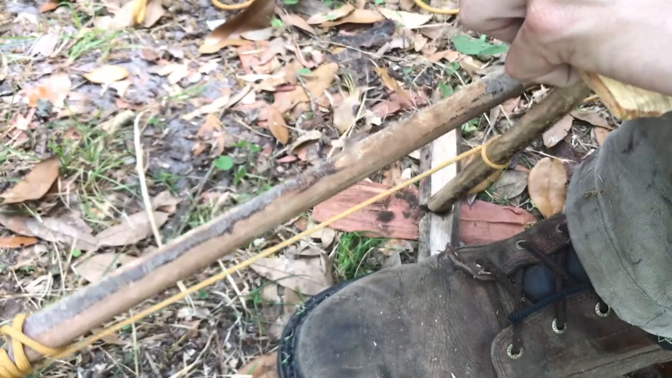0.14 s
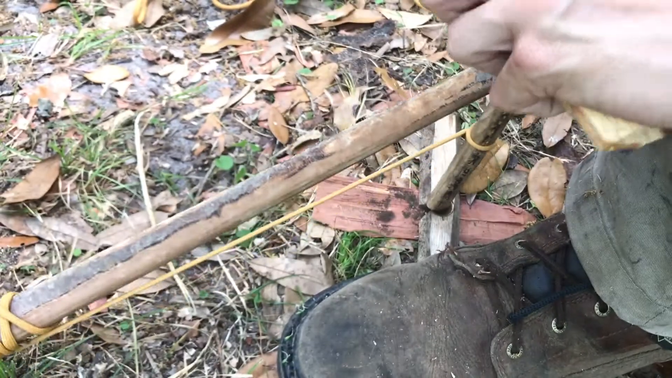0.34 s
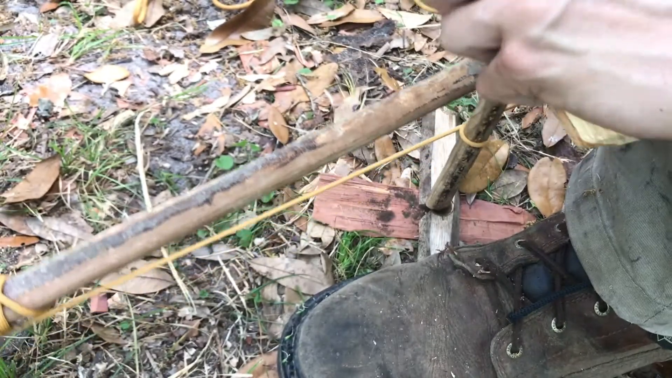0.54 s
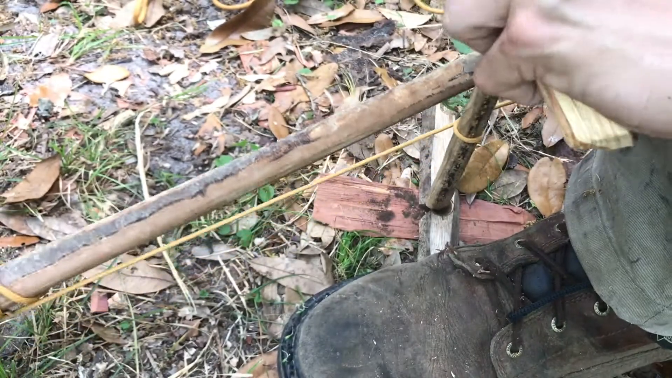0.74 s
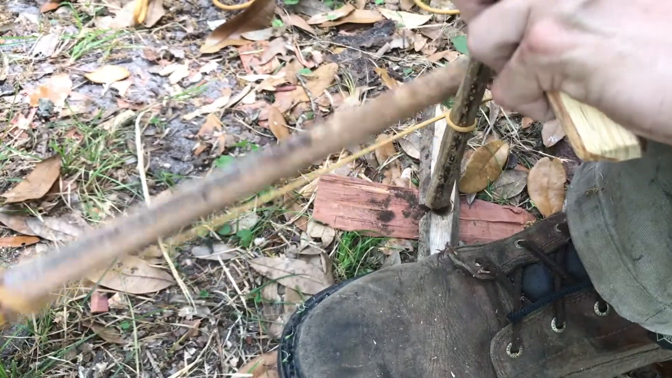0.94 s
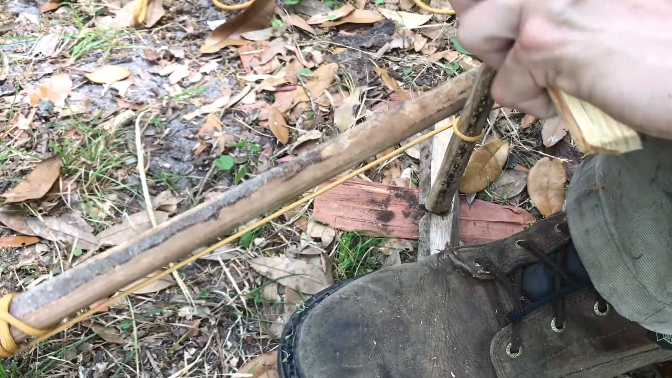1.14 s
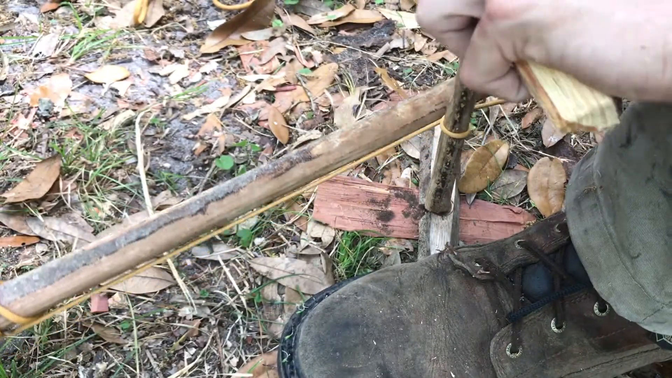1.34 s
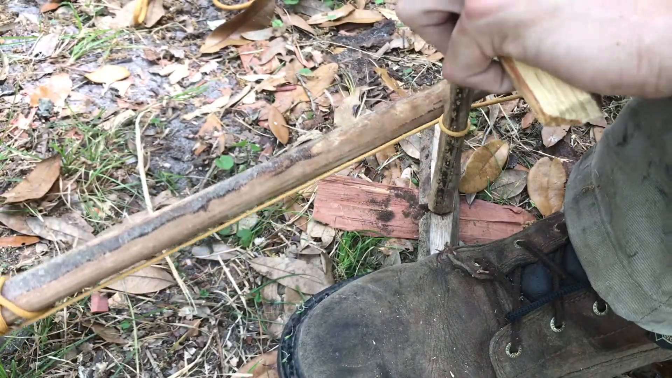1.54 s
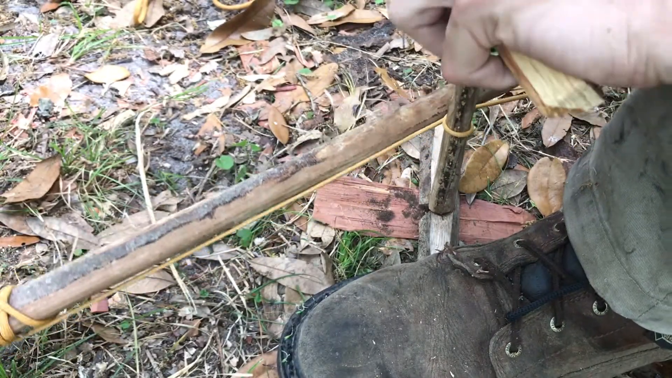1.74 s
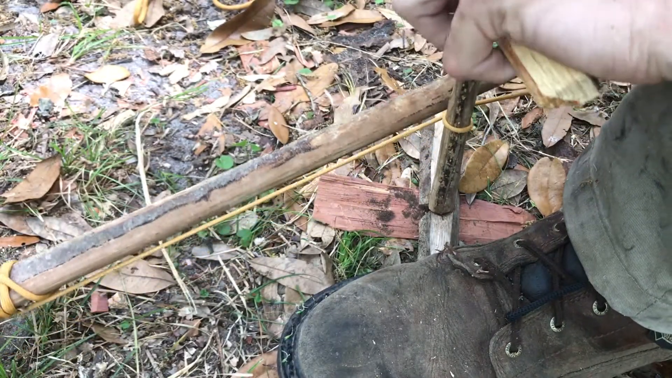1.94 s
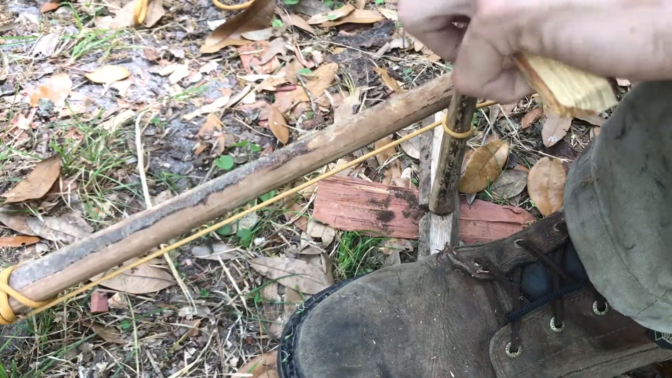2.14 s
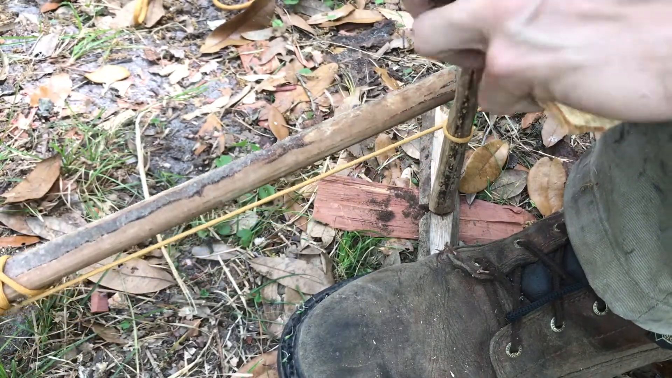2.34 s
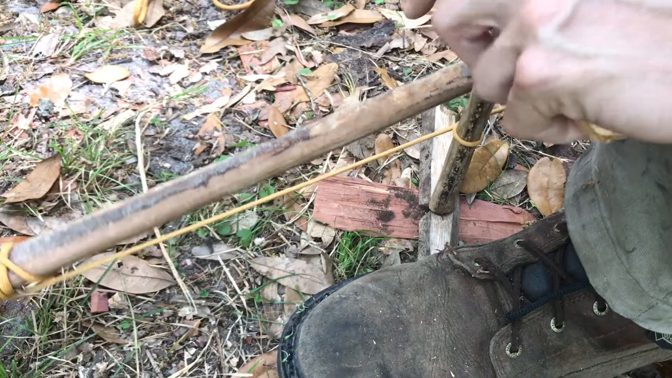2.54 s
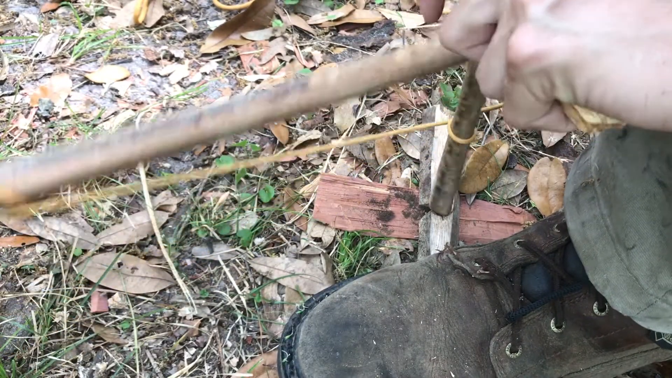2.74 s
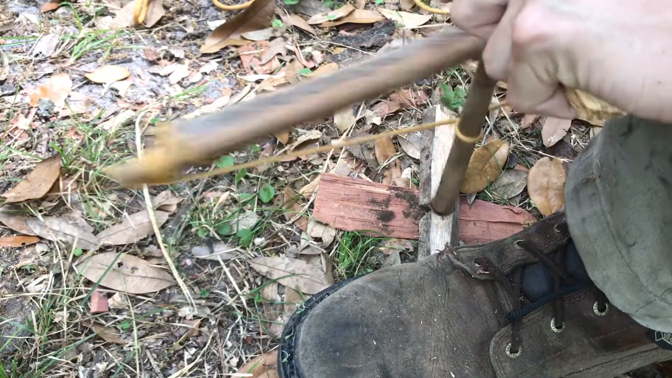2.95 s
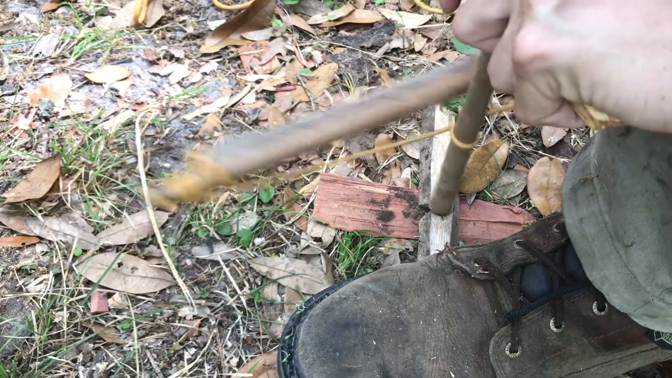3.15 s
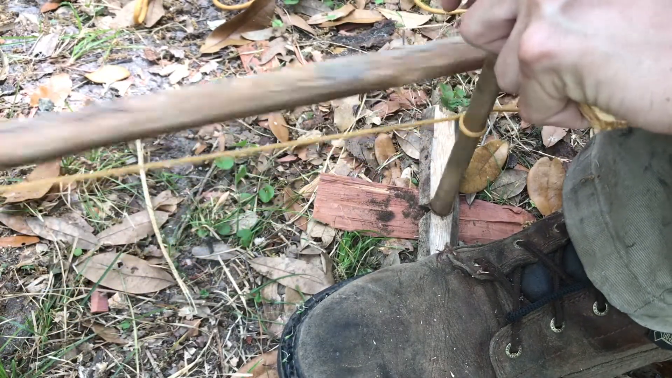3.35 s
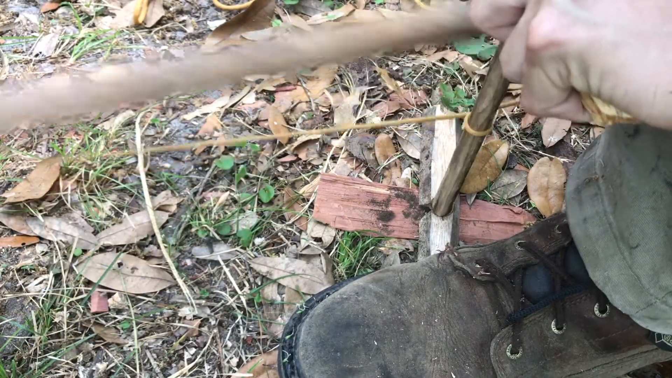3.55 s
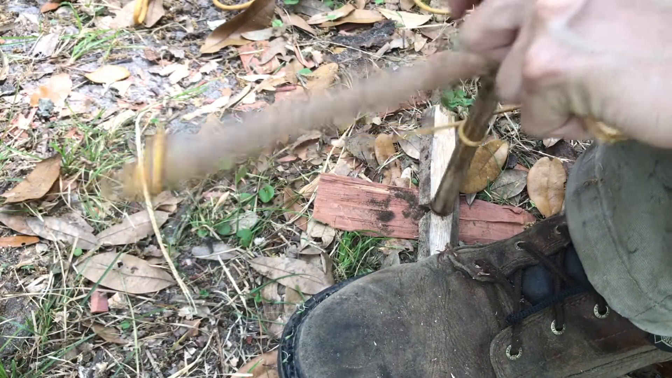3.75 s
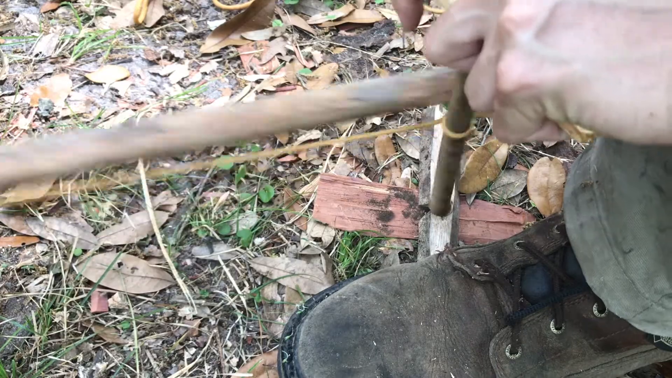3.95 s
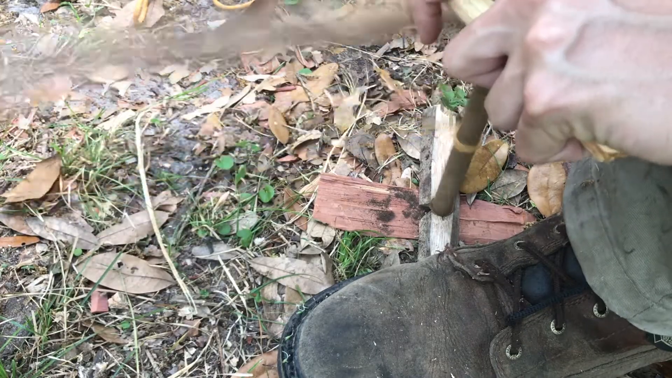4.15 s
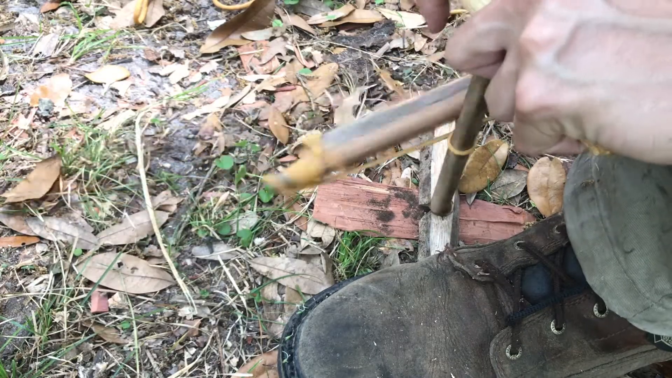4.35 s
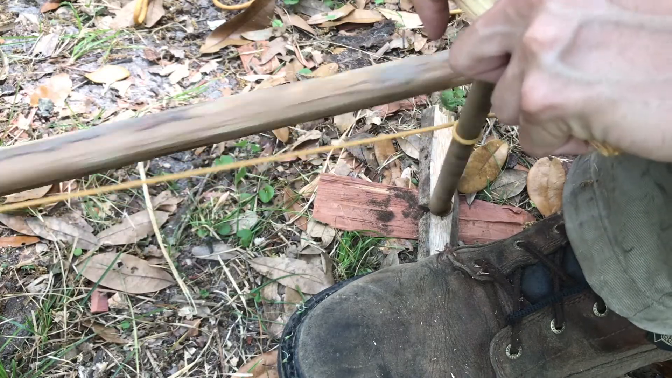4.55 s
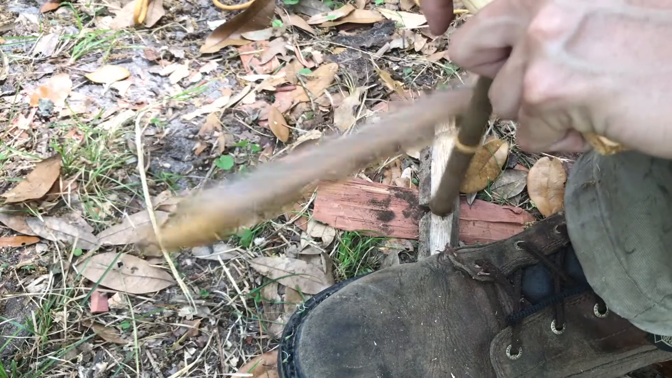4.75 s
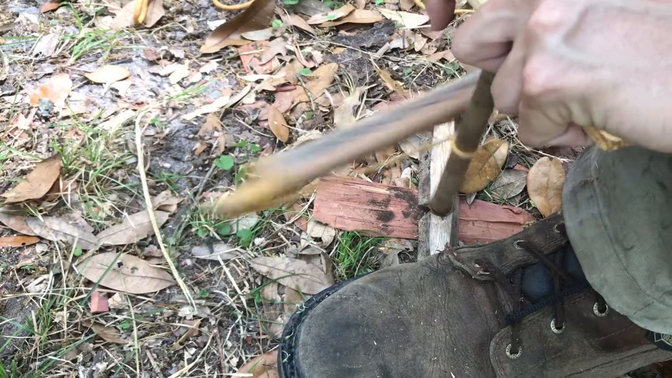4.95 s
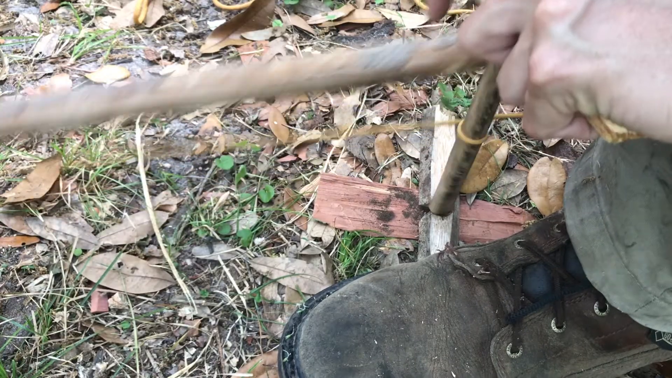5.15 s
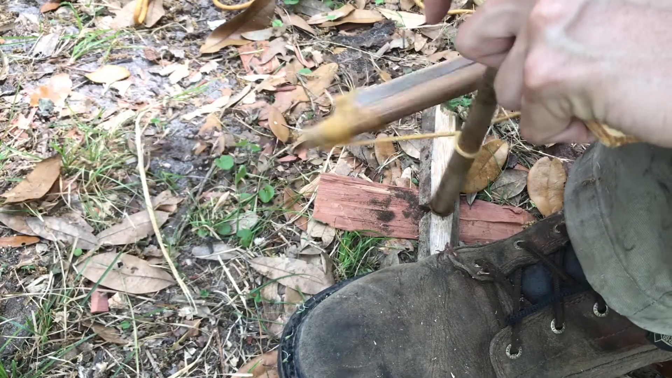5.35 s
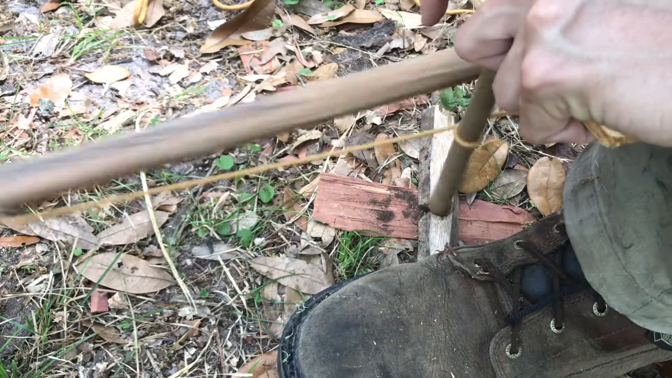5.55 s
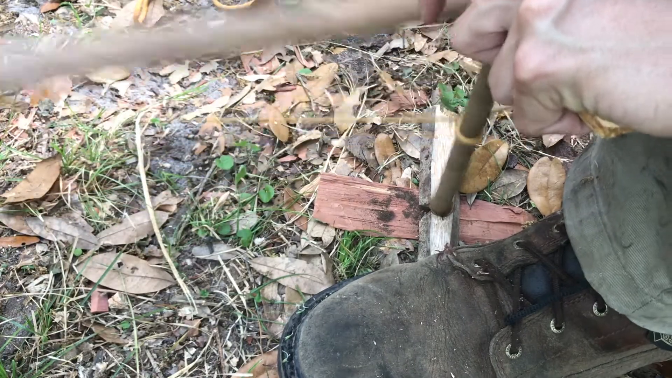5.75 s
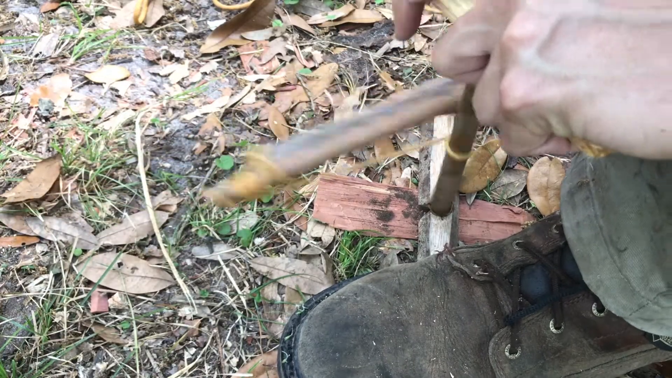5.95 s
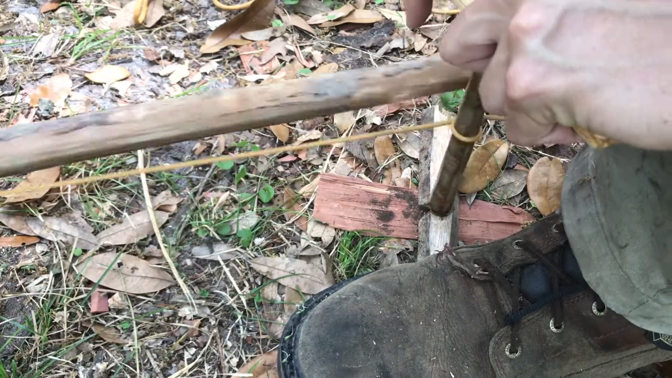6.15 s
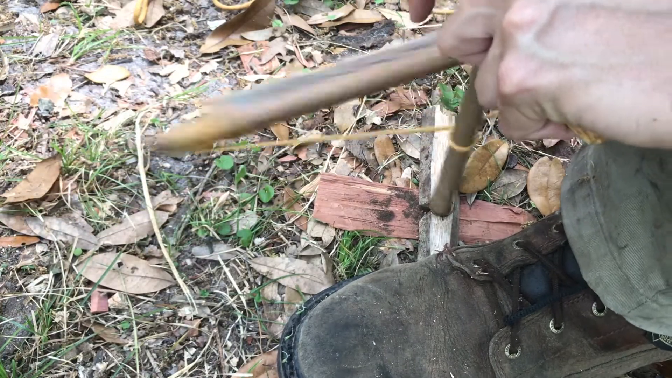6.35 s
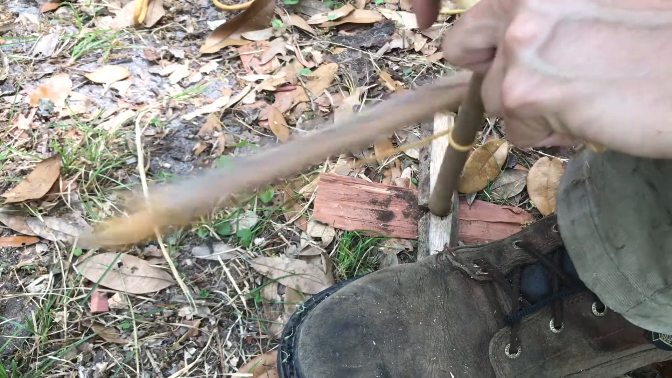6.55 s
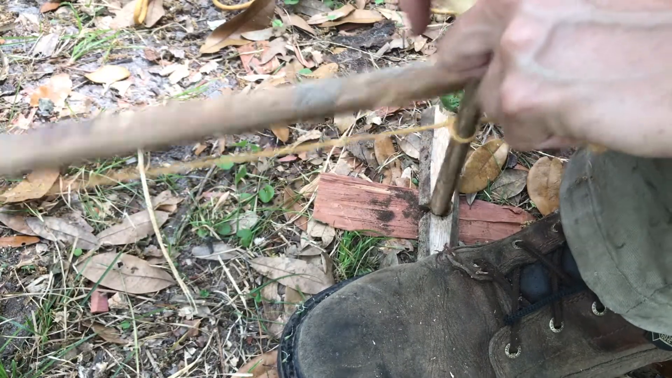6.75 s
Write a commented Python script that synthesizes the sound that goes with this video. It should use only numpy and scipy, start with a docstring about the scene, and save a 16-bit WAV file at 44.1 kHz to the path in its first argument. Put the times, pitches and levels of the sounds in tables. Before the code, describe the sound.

Almost three seconds of soft leaf crackle and stick taps, with one loud dry snap, come over high insect buzz and distant birds. Then uneven scraping strokes start and settle into a steady to-and-fro rasp of wood grinding on wood, each stroke swelling and dipping as the bow reverses. Brief piping squeaks and low knocking shudders join in. Mono, close and dry, in open air.

```python
"""Bow drill outdoors

Close to a small microphone, after some fumbling, a bow saws to and fro and spins a wooden spindle in
a fireboard: torn noise through resonances grinds and throbs once a turn, decaying modes knock and bump,
short swelling tones squeak or pip. Behind it narrow noise buzzes as insects high up, gliding breathy
tones whistle as far birds, and a low drone of slow noise hangs in the air."""
import sys
import numpy as np
from scipy import signal
from scipy.fft import rfft, irfft
from scipy.io import wavfile
from scipy.ndimage import uniform_filter1d

SR = 44100
rng = np.random.default_rng(int(sys.argv[2]) if len(sys.argv) > 2 else 0)


def to_wav(sig):
    """Store sig (one row per channel, or 1-D mono) as 16-bit WAV at the path in sys.argv[1].

    Samples outside -1..1 are clipped; the rate is SR.
    """
    pcm = np.clip(np.atleast_2d(sig), -1, 1) * 32767
    pcm = np.round(pcm).astype(np.int16)
    wavfile.write(sys.argv[1], SR, pcm.T)  # frames by channels


N = 299439
TIME = np.arange(N) / SR  # [s]


def amp(db):
    """Turns decibels into an amplitude factor."""
    return 10 ** (np.asarray(db) / 20)


def evened(x):
    """Scales x to an rms of one."""
    return x / np.sqrt(np.mean(x ** 2) + 1e-20)


def add(mix, start, sound):
    """Lays a sound into the mix from its start [s], cut at the end of the mix."""
    part = mix[max(round(start * SR), 0):][:len(sound)]
    part += sound[:len(part)]


def coloured(x, points, peaks=(), bed_db=0):
    """Gives x a smooth spectrum, with resonances standing on it."""
    hz = np.fft.rfftfreq(len(x), 1 / SR)
    point_hz, point_db = np.transpose(points)
    bed = np.interp(np.log(hz + 1), np.log(point_hz + 1), point_db) + bed_db
    power = amp(bed) ** 2
    for centre, width, top_db in peaks:
        power = power + amp(top_db) ** 2 / (1 + (2 * (hz - centre) / width) ** 2) ** 2
    return irfft(rfft(x) * np.sqrt(power), len(x))


def resonate(x, hz, width):
    """Resonates at the curve hz: shifts it down to zero, smooths twice and shifts back."""
    turn = np.exp(2j * np.pi * np.cumsum(hz * np.ones(len(x))) / SR)
    r = np.exp(-np.pi * width / SR)
    smooth = signal.lfilter([(1 - r) ** 2], [1, -2 * r, r * r], x / turn + 1e-18)
    return 2 * (turn * smooth).real


def wander(seconds):
    """Random drift of unit size that changes over the given time."""
    size = max(int(seconds * SR), 2)
    return evened(uniform_filter1d(uniform_filter1d(rng.standard_normal(N), size), size))


def patchy(x, depth_db, bins, frames):
    """Random patches in time and pitch make the sound swell and sink."""
    spectrum = signal.stft(x, nperseg=256, noverlap=192)[2]
    field = rng.standard_normal(spectrum.shape)
    for _ in range(2):
        field = uniform_filter1d(field, max(int(bins), 1), axis=0)
        field = uniform_filter1d(field, max(int(frames), 1), axis=1)
    patches = spectrum * amp(depth_db * evened(field))
    return signal.istft(patches, nperseg=256, noverlap=192)[1][:len(x)]


def air():
    """Distant rumble and hiss of coloured noise, with the drone's narrow noise lines wavering in it."""
    # spectrum of the open air, relative: (frequency [Hz], level [dB])
    air_spectrum = [(15, -54), (25, -11), (84, -3), (130, -13.5), (166, -9.5), (190, -27.5), (249, -20),
                    (405, -27.5), (1160, -33), (2050, -34), (5000, -37.5), (7110, -27.5), (10400, -49.5),
                    (14400, -28), (16000, -55)]
    # lines of a far engine: (frequency [Hz], width [Hz], level [dB])
    engine_lines = [(80.5, 5.8, -76.5), (161.5, 11.4, -79.5)]
    drone = np.zeros(N)
    for hz, width, db in engine_lines:
        drone += amp(db) * evened(resonate(rng.standard_normal(N), hz, width))
    level_db = -63.5 + 1.9 * wander(0.37)
    return amp(level_db) * evened(coloured(rng.standard_normal(N), air_spectrum)) + drone


def insects():
    """A smooth chorus of band noise, and one nearer singer whose buzz comes in short regular bursts."""
    # how the buzz moves: (time [s], level [dB], share of the nearest singer [0-1])
    buzz_course = [(0.0, -66.5, 0.3), (0.57, -67, 0.46), (0.83, -65.5, 0.56), (1.56, -66, 0.34),
                   (1.74, -67.5, 0.34), (1.94, -66.5, 0.5), (2.12, -63, 0.62), (2.28, -64.5, 0.43),
                   (2.46, -66, 0.45), (2.7, -68.5, 0.44)]
    time, db, near = np.transpose(buzz_course)
    beats = np.cumsum(52 * (1 + .012 * wander(0.28))) / SR  # about 52 bursts a second
    bursts = rng.standard_normal(N) * np.exp(-(beats % 1) / 0.37)
    chorus = evened(resonate(rng.standard_normal(N), hz=7470, width=1400))
    singer = evened(resonate(bursts, hz=7050, width=460))
    near = np.clip(np.interp(TIME, time, near), 0, 1)
    both = np.sqrt(1 - near) * chorus + np.sqrt(near) * singer
    return amp(np.interp(TIME, time, db)) * both


def birds():
    """Far whistles of gliding tone and breathy noise; the trees send a smear of echoes after them."""
    # one row a whistle: (start [s], length [s], first pitch [Hz], last pitch [Hz], top level before
    # tone and breath are blended [dB], how much the glide slows at its end, place of the top [0-1])
    whistles = [(0, 0.23, 2590, 1710, -75.5, 1.8, 0.3), (0, .12, 2900, 2950, -80, 1.1, .1),
                (0.178, .1, 3630, 3230, -88, 1.1, .4), (.43, .09, 2210, 2160, -85, 1.1, .2),
                (0.565, .28, 3105, 1866, -76, 1.6, 0.56), (.56, .07, 4500, 4500, -82, 1.1, .2),
                (0.733, 0.15, 4370, 4450, -80, 1.1, .85), (0.918, 0.18, 2700, 2690, -75, 1.1, 0.1),
                (0.936, 0.2, 4500, 4420, -76, 1.1, 0.3), (1.958, 0.2, 3690, 3630, -75, 1.1, 0.1),
                (2.024, 0.51, 2770, 2460, -76, 4.5, .3), (3.692, .1, 2390, 2360, -73, 1.1, 0.4),
                (0.303, 0.19, 10950, 14400, -81, 1.05, .5), (.3, .1, 12500, 14100, -85, 1.1, .4),
                (.42, .05, 12300, 12600, -83, 1.1, .4), (.44, .1, 11200, 11550, -87, 2.5, .4),
                (0.562, .27, 14000, 11300, -81, 1.2, 0.2), (0.632, 0.16, 14700, 12200, -88, 1.1, .3)]
    out = np.zeros(N)
    for start, length, first_hz, last_hz, top_db, bend, top in whistles:
        t = np.arange(0, length, 1 / SR)
        hz = last_hz + (first_hz - last_hz) * np.clip(1 - t / length, 0, 1) ** bend
        # swells to its top and fades
        db = top_db + np.interp(t / length, [0, np.clip(top, .01, .99), 1], [-2.5, 0, -13])
        pure = np.sqrt(2) * np.sin(2 * np.pi * np.cumsum(hz) / SR)
        breath = evened(resonate(rng.standard_normal(SR)[:len(t)], hz, width=130))
        whistle = 0.36 * pure + 1.15 * breath
        add(out, start, amp(db) * whistle * signal.windows.tukey(len(t), .06))
    echoes = rng.standard_normal(SR // 2) * amp(-60 * TIME[:SR // 2] / .55)  # 60 dB down in 0.55 s
    echoes /= np.linalg.norm(echoes)
    return out + amp(-1.5) * signal.oaconvolve(out, echoes)[:N]


def rustles():
    """Crackly noises that swell and stop, over sparse faint crackle of the litter."""
    # spectrum of dry leaves, relative: (frequency [Hz], level [dB])
    leaf_spectrum = [(290, -41.5), (500, -6.5), (3540, -9.5), (5630, -5), (6510, -4.5), (9220, -1),
                     (10800, -12.5), (12900, 1.5), (16000, -17)]
    # short noises, and quiet low rubbing between strokes:
    # (start [s], length [s], level before the swell [dB], centre [Hz], level of the centre band [dB])
    short_noises = [(0.523, 0.032, -55, 3700, -4), (0.568, 0.018, -66, 3300, -1),
                    (0.92, 0.048, -62, 4180, -3), (1.002, 0.017, -42, 4500, -6),
                    (1.034, 0.041, -58.5, 3680, -3), (1.085, 0.0073, -55, 2960, -10),
                    (1.126, 0.0068, -66, 4270, 2), (1.511, 0.01, -49.5, 4800, -3),
                    (1.532, 0.018, -44, 5460, -7.5), (1.694, 0.0091, -49, 5000, -4),
                    (1.905, 0.029, -64.5, 3630, 9.5), (2.28, 0.026, -58, 3850, -5),
                    (2.385, 0.033, -62.5, 4000, -9), (2.442, 0.019, -67, 2300, 1),
                    (2.66, 0.071, -61, 4000, -15), (3.045, 0.15, -53, 2270, -18),
                    (3.42, 0.043, -60, 3000, -4.5), (3.553, 0.086, -64.5, 596, 2.5),
                    (2.68, 0.56, -84, 344, 18.5), (2.723, 0.055, -51.5, 3500, -4)]
    crackly = rng.standard_normal(N) * amp(2.2 * wander(0.0011))
    hiss = evened(coloured(crackly, leaf_spectrum))
    out = np.zeros(N)
    for start, length, db, hz, centre_db in short_noises:
        part = hiss[int(start * SR):int((start + length) * SR)]
        part = part + amp(centre_db) * evened(resonate(part, hz, 0.57 * hz))
        place = np.linspace(0, 1, len(part))
        swell = np.interp(place, [0, .45, .85, 1], [0.18, 0.55, 0.43, 0.43])
        add(out, start, amp(db) * part * swell)
    clicks = (rng.random(N) < 14 / SR) * amp(-69 + 4.0 * rng.random(N))  # about 14 a second
    crackle = hiss * signal.oaconvolve(clicks, np.hanning(200))[:N]
    return out + patchy(crackle, depth_db=3.6, bins=14, frames=4.3)


def ticks():
    """A blow rings the modes near its centre, snaps, thuds, and comes back weaker off the ground."""
    # what the sticks ring with: (frequency [Hz], level [dB], fall by 60 dB [s])
    wood_modes = [(333, -27, 0.03), (820, -3.5, 0.022), (1235, 2, 0.011), (1427, -2, 0.014),
                  (2474, -1, 0.013), (2845, -1, 0.016), (3340, 4, 0.0084), (3664, -3.5, 0.016),
                  (4510, 8, 0.0061), (5360, -0.5, 0.014), (5195, 7.5, 0.0065), (6120, -4, 0.011),
                  (8460, 3, 0.0064), (563, -19, 0.0083)]
    # wood knocks: (time [s], peak of the ring [dB], centre of the modes struck [Hz], spread [octaves],
    # crisp snap against the ring [dB], low thud against the ring [dB])
    knocks = [(.858, -48.5, 4500, 0.62, 3, -17), (1.015, -37.5, 1250, 0.69, -12, -10),
              (1.099, -47.5, 4420, 0.93, 4, -16), (1.102, -55, 786, 0.49, -30, -2),
              (1.522, -52, 5000, 0.54, -2, -6), (1.54, -50.5, 1320, 0.48, -6, -1.5),
              (1.7058, -20.5, 3600, 1.7, 4.5, -26.5), (2.014, -51, 5200, 0.49, 9, -35),
              (2.064, -60, 4170, 0.37, -12, -30), (2.381, -41, 1460, 0.6, -11, -19),
              (2.682, -42.5, 4500, 0.81, 7, -36), (2.725, -49, 4000, .6, 2, -19),
              (2.753, -31.5, 5130, 0.65, 4.5, -32), (4.016, -58, 3000, 1.0, -8, -2),
              (6.742, -48.5, 2500, 1.2, -8, -22)]
    out, t = np.zeros(N), np.arange(2500) / SR
    hz, mode_db, t60 = np.transpose(wood_modes)[:, :, None]
    noises = rng.standard_normal((len(knocks), len(t)))
    for (start, db, centre_hz, spread, snap_db, thud_db), noise in zip(knocks, noises):
        weight_db = mode_db - 4.4 * (np.log2(hz / centre_hz) / spread) ** 2
        phase = noise[:len(hz), None]
        modes = amp(weight_db - 60 * t / t60) * np.sin(2 * np.pi * hz * t + phase)
        ring = modes.sum(0) * np.minimum(t / 0.0021, 1)
        burst = noise * amp(-60 * t / 0.0061) * np.minimum(t / 0.00074, 1)
        snap = resonate(burst, hz=14500, width=6400)
        glide_hz = 210 + 600 * np.exp(-t / 0.0046)  # the thud sinks as the stick settles
        thud = np.sin(2 * np.pi * np.cumsum(glide_hz) / SR)
        thud *= amp(-60 * t / 0.064) * np.minimum(t / 0.0041, 1)
        knock = ring / abs(ring).max() + amp(snap_db) * snap / abs(snap).max() + amp(thud_db) * thud
        knock *= amp(db)
        add(out, start, knock)
        add(out, start + 0.0029, 0.23 * knock)  # off the ground
    return out


def squeaks():
    """Each tone swells at one pitch and is cut short, while other modes of the wood rattle along."""
    # short tones: squeaks of the turning spindle, and small pips of wood ringing at one pitch:
    # (peak time [s], peak of the tone [dB], length [s], pitch [Hz], rattle of other modes [dB])
    short_tones = [(1.59, -44.5, 0.0025, 3970, -24), (1.99, -49.5, 0.0046, 2690, -24),
                   (3.492, -34.5, 0.0056, 3540, -16.5), (3.531, -37, 0.0091, 2610, -11),
                   (3.538, -36, .008, 3460, -13), (4.124, -23, 0.0046, 3320, -15),
                   (4.139, -34, 0.011, 3550, -25), (4.17, -25, 0.0098, 3310, -9),
                   (4.201, -19, 0.0075, 3300, -12.5), (4.221, -28, 0.0036, 3250, -6),
                   (4.231, -19, 0.0088, 3290, -15), (4.245, -43, 0.0028, 3300, -18),
                   (4.263, -32, 0.0076, 3190, -10), (4.27, -37, .004, 3200, -12),
                   (4.271, -39.5, 0.013, 1910, -25), (4.405, -35, 0.01, 2320, -9),
                   (4.473, -36, 0.0061, 2350, -1), (4.677, -31, 0.0045, 3380, -3.5),
                   (4.718, -22, 0.0083, 3310, -22), (4.744, -19.5, 0.0044, 3300, -21),
                   (4.77, -23, .007, 3300, -19), (4.782, -40, .005, 3250, -23),
                   (5.257, -31.5, 0.0061, 3320, -10), (5.279, -29, 0.0029, 3240, -7),
                   (6.002, -36, 0.0048, 2490, -10)]
    # modes shaken along: (frequency [Hz], width [Hz], level [dB])
    shaken_modes = [(1190, 400, -6), (2030, 310, -4), (5330, 460, -3)]
    out, rattle = np.zeros(N), np.zeros(N)
    for hz, width, db in shaken_modes:
        rattle += amp(db) * evened(resonate(rng.standard_normal(N), hz, width))
    for (middle, db, length, hz, others_db), phase in zip(short_tones, rng.random(len(short_tones))):
        t = np.arange(-1.5 * length, length, 1 / SR)
        swell = np.exp(-(t / np.where(t < 0, 0.71 * length, 0.18 * length)) ** 2)
        tone = np.sin(2 * np.pi * (hz * t + phase))
        tone += amp(others_db) * rattle[int(middle * SR):][:len(t)]
        add(out, middle + t[0], amp(db) * swell * tone)
    return out


def strokes():
    """The bow swings like a pendulum; level and colour follow its speed."""
    # bow strokes: (start [s], length [s], level at top speed [dB], share of the swing lost before the
    # spindle breaks loose [0-1], lateness of top speed, share of pull colour [0-1],
    # board tone at top speed [dB], treble at top speed [dB])
    bow_strokes = [(2.751, 0.11, -39, 0.14, 1.5, 0.82, -3, -3),
                   (2.856, 0.19, -34.5, 0.074, 1.26, 0.36, -1, -2.5),
                   (3.118, 0.28, -35.5, 0.076, 1.02, 0.17, -1.5, 1.5),
                   (3.463, .1, -31.5, 0.025, 1.53, 0.52, -4, -2.5),
                   (3.557, 0.11, -46, .35, 1.1, 0.85, -8, 3.5),
                   (3.633, 0.085, -35.5, 0.11, 0.91, .6, -4, -3.5),
                   (3.755, 0.25, -35, 0.041, 1, .07, -2.5, 1),
                   (4.023, 0.3, -34, 0.05, 1.11, 0.68, -0.5, -2),
                   (4.344, 0.26, -35, 0.019, 1.045, 0.01, -.5, 1.5),
                   (4.61, .25, -33, 0.064, 1.13, 0.66, 1, -2.5),
                   (4.884, 0.25, -34.5, 0.15, 1.31, 0.22, 1, 0.5),
                   (5.148, 0.24, -30.5, 0.037, 1.05, 0.73, -1.5, -3.5),
                   (5.407, 0.23, -34, 0.24, 1.73, .12, -1, 0),
                   (5.657, 0.21, -29.5, 0.17, 1.59, 0.75, -3, -5),
                   (5.933, 0.23, -35, 0.17, 1.03, 0.08, -.5, 2),
                   (6.176, 0.24, -30, 0.0085, 1.25, .79, -4, -4.5),
                   (6.48, 0.25, -35.5, 0.21, 1.18, 0.02, .5, 2.5),
                   (6.756, 0.3, -33, .01, 1.16, 0.66, -1, .1)]
    # the spindle jams for a moment: (middle [s], length [s], dip [dB])
    jams = [(3.624, 0.014, -2), (4.103, 0.016, -13), (5.684, 0.012, -7), (5.938, 0.0028, -20),
            (6.4867, 0.0039, -24)]
    db_per_speed = 21.5  # level gained for ten times the speed
    board_slow_db, treble_slow_db = (1, -6.0), (1.5, -2.5)  # change towards standstill: (push, pull)
    gain, pull, board_db, treble_db = np.zeros((4, N))
    for start, length, top_db, lost, late, pull_share, tone_db, tilt_db in bow_strokes:
        on = (TIME >= start) & (TIME < start + length)
        lost = np.clip(lost, 0, 1)
        swing = lost + (1 - lost) * (TIME[on] - start) / length
        speed = np.clip(np.sin(np.pi * swing ** late), 1e-4, 1)
        gain[on] += amp(top_db + db_per_speed * np.log10(speed))
        pull[TIME >= start] = pull_share
        board_db[on] = tone_db + np.interp(pull_share, [0, 1], board_slow_db) * (1 - speed)
        treble_db[on] = tilt_db + np.interp(pull_share, [0, 1], treble_slow_db) * (1 - speed)
    jam_db = np.zeros(N)
    for middle, length, dip_db in jams:
        jam_db += dip_db * np.exp(-(2 * (TIME - middle) / length) ** 2)
    gain = uniform_filter1d(gain, size=40) * amp(jam_db)
    return gain, pull, uniform_filter1d(board_db, size=200), uniform_filter1d(treble_db, size=200)


def drill():
    """Fibres tear in dense clumps; the uneven tip presses harder once a turn."""
    # resonances of spindle, socket and board, either way: (frequency [Hz], width [Hz], level [dB])
    push_modes = [(1232, 276, -5.5), (1580, 240, -8.5), (2319, 260, -0.5), (4090, 540, -2), (5436, 1260, 1),
                  (8450, 350, 0.5), (9720, 400, -3), (12900, 330, -37.5)]
    pull_modes = [(1506, 140, -4.5), (2563, 260, 2.5), (3660, 490, -3), (5380, 200, -16.5), (6800, 880, -5),
                  (8860, 450, 0.5), (11300, 320, -4.5), (12800, 430, 1), (13400, 64, 6), (14100, 59, -11)]
    # grinding noise between the resonances, relative: (frequency [Hz], level [dB])
    grit_spectrum = [(410, -79), (700, -36), (1210, -4), (1800, -10), (3370, -1), (7690, -5.5),
                     (8760, -4.5), (10700, -9), (13100, 0), (16000, -9)]
    # shudder of the board on the ground, relative: (frequency [Hz], level [dB])
    shudder_spectrum = [(65, -60), (110, -2), (151, -1.5), (236, 3.5), (461, -5), (611, -7.5), (900, -8.5),
                        (1170, -32), (1980, -120)]
    gain, pull, board_db, treble_db = strokes()
    turns = np.cumsum(34.2 * (1 + 0.1387 * wander(0.0575))) / SR  # about 34 turns a second
    throb_db = 1.0 * np.cos(2 * np.pi * turns) + 1.33 * wander(0.006) + 1.3 * wander(0.0016)
    fibres = rng.standard_normal(N) * amp(throb_db)
    fibres = patchy(fibres, depth_db=1.93, bins=3, frames=6)
    pull = np.clip(pull, 0, 1)
    grind = np.sqrt(1 - pull) * evened(coloured(fibres, grit_spectrum, push_modes, bed_db=-1.0))
    # reversed in time, the same noise serves as a second one
    grind += np.sqrt(pull) * evened(coloured(fibres[::-1], grit_spectrum, pull_modes, bed_db=-0.5))
    board = signal.sosfiltfilt(signal.butter(3, 2900, fs=SR, output="sos"), grind)
    treble = signal.sosfiltfilt(signal.butter(3, 7600, "high", fs=SR, output="sos"), grind)
    middle = grind - board - treble
    shudder = amp(-25.5) * evened(coloured(fibres * amp(0.59 * throb_db), shudder_spectrum))
    # patches come and go as the contact shifts from mode to mode
    sound = amp(board_db) * patchy(board, depth_db=1.0, bins=1.4, frames=6.4)
    sound += amp(1.2 * board_db) * shudder + middle + amp(treble_db) * treble
    return gain * sound


def bumps():
    """Each bump is a soft push that sets the board ringing briefly; five make a run."""
    # fireboard modes: (frequency [Hz], level [dB], fall by 60 dB [s])
    board_modes = [(260, -6, 0.024), (594, -6.5, 0.019), (1057, -3.5, 0.023), (1275, 3.5, 0.018)]
    # the crooked tip bumps the wall of its socket once a turn, in runs: (middle bump [s],
    # turns a second before the gaps are stretched [Hz], peak [dB], loss at the next bumps [dB])
    bump_runs = [(3.263, 25, -43, 2.5), (4.19, 30, -34, 3), (4.471, 29.3, -37.5, 1.5),
                 (4.739, 43, -33.5, 3.5), (5.018, 39, -38.5, 0.5), (5.274, 42, -40, 2.2),
                 (5.524, 40, -33.5, 1.2), (5.788, 33, -37.5, 7.5), (6.026, 34, -41.5, 1.5),
                 (6.279, 47, -41, 4), (6.578, 31, -42, 3)]
    out, t = np.zeros(N), np.arange(2000) / SR
    hz, mode_db, t60 = np.transpose(board_modes)[:, :, None]
    run_lucks = rng.standard_normal((len(bump_runs), 5, 3, len(board_modes), 1))
    for (middle, turns_hz, db, fall_db), lucks in zip(bump_runs, run_lucks):
        for k, (level_luck, pitch_luck, phase) in zip(np.arange(-2, 3), lucks):
            mode_hz = hz * (1 + 0.021 * pitch_luck)
            decay = amp(mode_db + 2 * level_luck - 60 * t / t60)
            modes = decay * np.sin(2 * np.pi * (mode_hz * t + phase))
            ring = modes.sum(0) * np.minimum(t / 0.0029, 1) ** 2
            # turns take longer away from the middle of a run
            start = middle + k / turns_hz * (1 + .03 * k * k)
            add(out, start, amp(db - fall_db * k * k) * ring / abs(ring).max())
    return out


def scene():
    """Sums the place and the work in it on one channel."""
    place = air() + insects() + birds()
    work = rustles() + ticks() + squeaks() + drill() + bumps()
    return (place + work)[None]


def record(dry):
    """The small microphone loses the lowest bass; then the band is limited at 15.8 kHz."""
    thin = signal.sosfilt(signal.butter(3, 42, "high", fs=SR, output="sos"), dry)
    band = signal.firwin(511, 15800, window=("kaiser", 9), fs=SR)
    return signal.oaconvolve(thin, band[None], "same")


dry = scene()
out = record(dry)
to_wav(out)
```